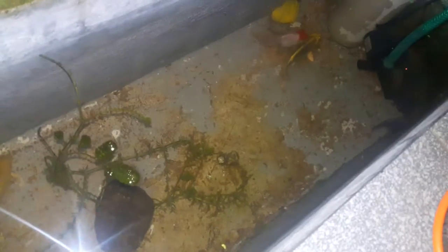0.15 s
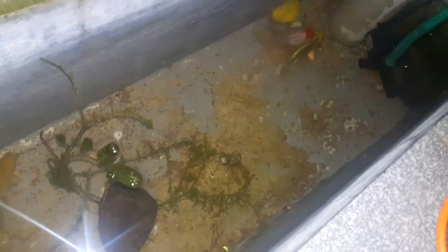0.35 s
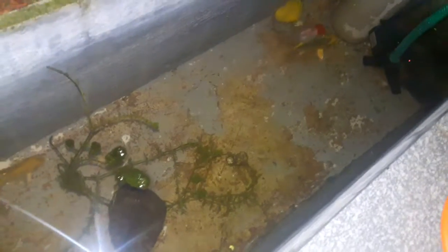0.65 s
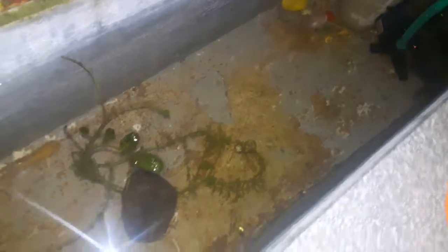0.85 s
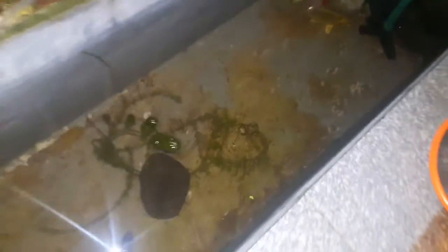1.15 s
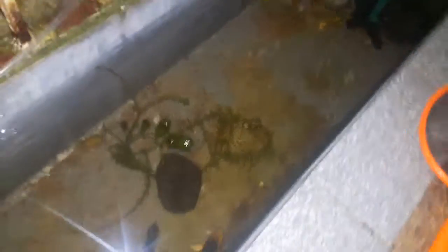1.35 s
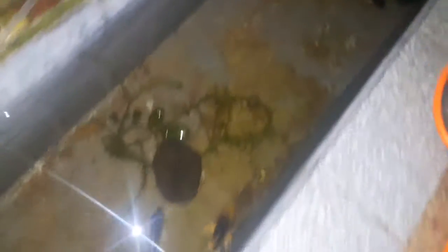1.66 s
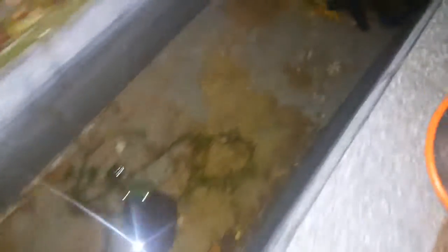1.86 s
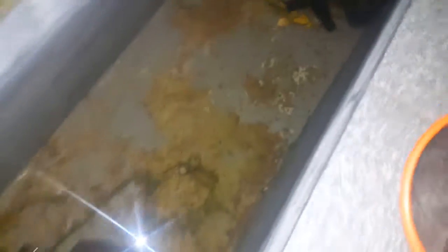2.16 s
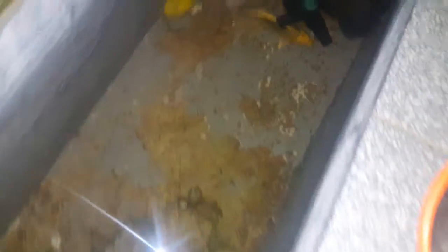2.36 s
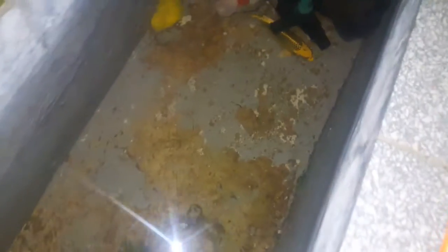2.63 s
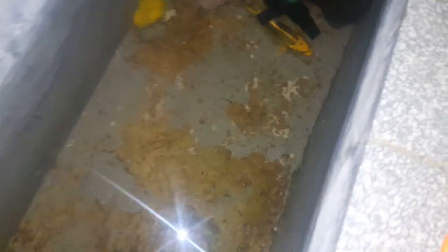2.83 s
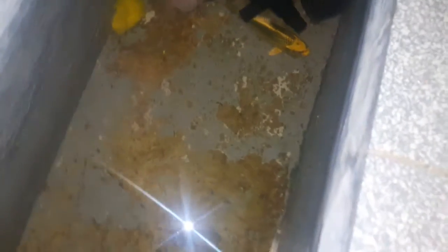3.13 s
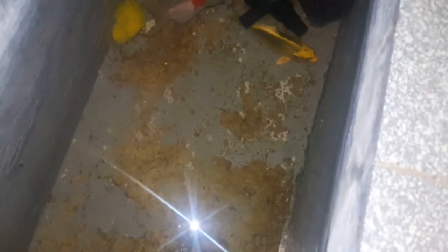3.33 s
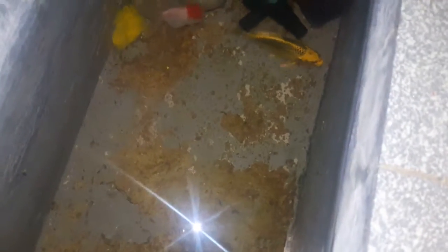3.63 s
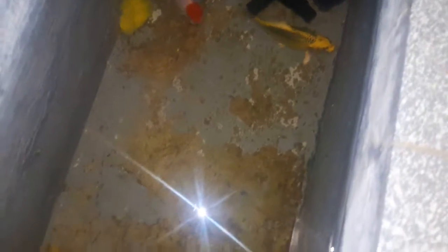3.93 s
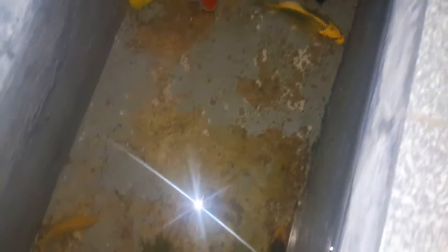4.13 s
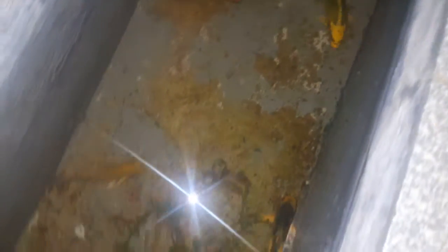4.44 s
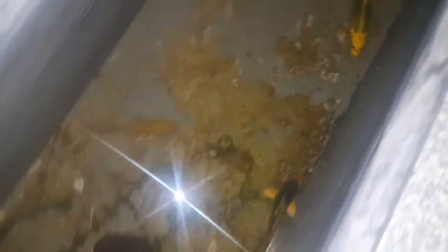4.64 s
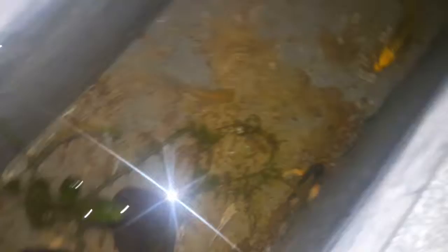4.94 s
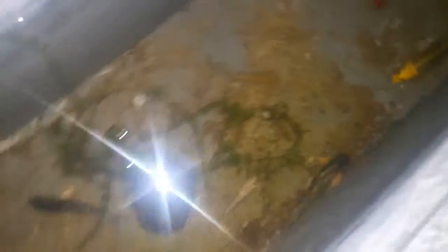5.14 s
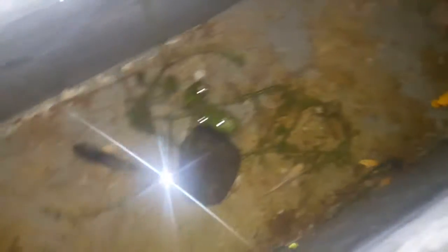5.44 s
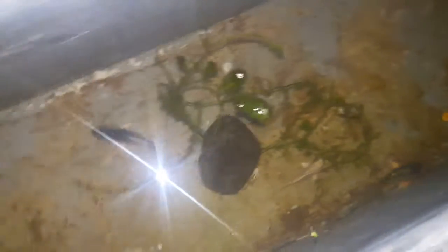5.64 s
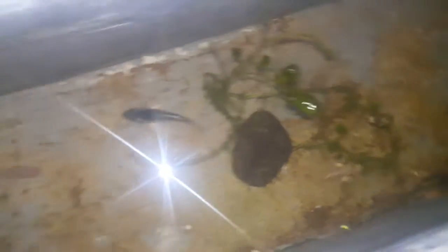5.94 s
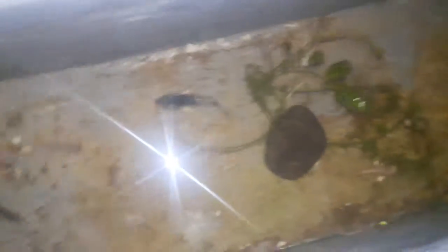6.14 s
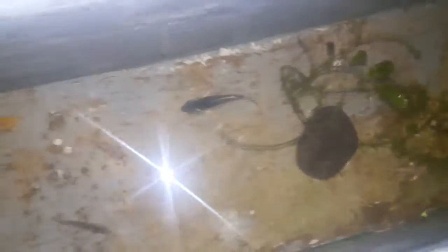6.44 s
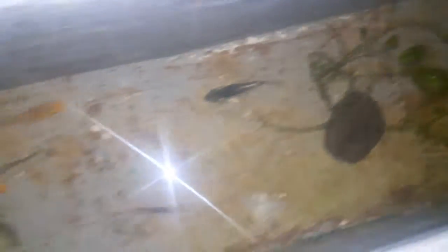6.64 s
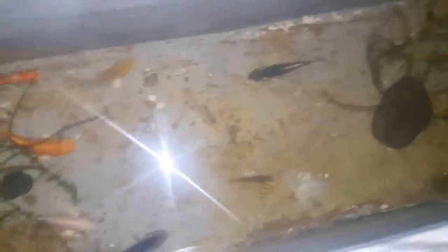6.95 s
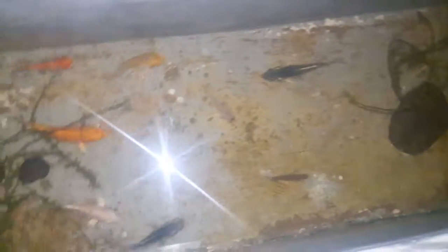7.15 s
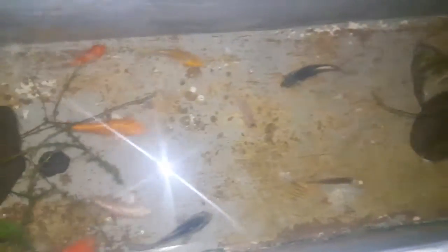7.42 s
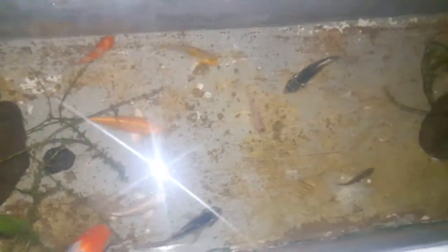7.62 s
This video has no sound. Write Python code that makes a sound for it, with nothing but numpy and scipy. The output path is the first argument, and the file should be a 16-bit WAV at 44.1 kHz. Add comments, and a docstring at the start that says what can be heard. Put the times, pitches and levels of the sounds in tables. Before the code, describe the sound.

A submerged pump hums low in a shallow fish tank while water churns, washes and pops with bubbles; close dull thuds and scrapes knock the microphone.

```python
"""A pump hums in a shallow fish tank while its moving water churns low, washes softly and pops with small bubbles.
Then knocks come close to the microphone: dull thuds, a short skid, rough scrapes and hard taps.
The hum is a set of sine waves, the water is shaped noise with tiny rings, and every knock rings one hollow body.
The hand-held microphone sounds muffled above 3 kHz and hisses faintly; the heaviest thud makes its gain control
turn the sound down for a second or two."""
import sys
import numpy as np
from scipy import signal
from scipy.fft import rfft, irfft, next_fast_len
from scipy.io import wavfile
from scipy.ndimage import uniform_filter1d, minimum_filter1d, map_coordinates

SR = 44100
rng = np.random.default_rng(int(sys.argv[2]) if len(sys.argv) > 2 else 0)


def file_out(sig):
    """Save sig as 16-bit WAV at sys.argv[1]."""
    # one column per channel
    cols = np.atleast_2d(sig).T
    # limit, then scale
    lim = np.clip(cols, -1, 1)
    pcm = np.round(lim * 32767).astype(np.int16)
    wavfile.write(sys.argv[1], SR, pcm)


N = 343098  # length in samples


def amp(db):
    """Turn decibels into a gain."""
    return 10 ** (np.asarray(db) / 20)


def unit(x):
    """Scale x to an rms of 1."""
    return x / np.sqrt(np.mean(x ** 2) + 1e-20)


def curves(rows):
    """Draw straight lines between table rows: one curve for each column after the time."""
    seconds, *columns = np.transpose(rows)
    t = np.arange(N) / SR
    return [np.interp(t, seconds, column) for column in columns]


def wobble(rate):
    """Draw a smooth random curve through `rate` random points a second."""
    points = rng.standard_normal(int(N * rate / SR) + 4)
    return map_coordinates(points, [np.arange(N) * rate / SR])


def filtered(x, response):
    """Multiply the spectrum of x by a response, which may be complex."""
    size = next_fast_len(len(x) + 8192)  # spare room so that the end does not wrap round
    hz = np.fft.rfftfreq(size, 1 / SR)
    return irfft(rfft(x, size) * response(hz), size)[:len(x)]


def coloured(x, spectrum):
    """Shape x by (Hz, dB) points on a log pitch scale, at rms 1."""
    points_hz, db = np.transpose(spectrum)
    return unit(filtered(x, lambda hz: amp(np.interp(np.log(hz + 1), np.log(points_hz), db))))


def edge(x, hz, kind, order):
    """Cut away the highs ("low" pass) or the lows ("high" pass), without looking ahead."""
    sections = signal.butter(order, min(hz, SR / 2 - 1), kind, fs=SR, output="sos")
    return signal.sosfilt(sections, x)


def add(track, start_s, sound):
    """Mix a sound into the track from its start time."""
    part = track[max(round(start_s * SR), 0):][:len(sound)]
    part += sound[:len(part)]


def room(x, t60):
    """Walls answer with a short noisy tail that falls 60 dB in t60 seconds."""
    t = np.arange(SR // 3) / SR
    build_up = 1 - np.exp(-t / 0.0078)
    tail = rng.standard_normal(len(t)) * amp(-60 * t / t60) * build_up
    return signal.fftconvolve(x, tail / np.linalg.norm(tail))[:N]


# How strongly the hum carries. Each row: time in seconds, gain in dB.
HUM_GAIN = [(0, -4), (2.6, -8.5), (3.5, -1.5), (5.7, -4.5), (6.2, 3), (7.78, 5)]
# The pump's tones. Each row: multiple of the mains rate, rms level in dB before waver and hum gain.
PUMP_TONES = [(1, -58), (2, -50.5), (3, -64), (4, -50), (6, -60), (7, -67), (12.3, -67)]
MAINS_HZ = 60


def pump():
    """The rotor runs locked to the mains; each tone wavers with the load of the water."""
    turns = MAINS_HZ * np.arange(N) / SR
    hum = np.zeros(N)
    for multiple, db in PUMP_TONES:
        waver_db = 1.6 * wobble(4)
        phase = 2 * np.pi * (multiple * turns + rng.random()) + 0.19 * wobble(5)
        hum += np.sqrt(2) * amp(db + waver_db) * np.sin(phase)
    return hum * amp(curves(HUM_GAIN)[0])


def bubble(hz, t60, rise):
    """A pocket of air rings and climbs in pitch, by the fraction `rise` in t60 seconds, as it nears the surface."""
    t = np.arange(SR // 16) / SR
    ring = np.sin(2 * np.pi * hz * (t + rise * t * t / (2 * t60)))
    return ring * amp(-60 * t / t60) * (1 - np.exp(-t / 0.00021))


def fizz(count, spread_db, pitch_hz, life):
    """Many small bubbles ring in clusters of four, a few louder than the rest."""
    out = np.zeros(N)
    for cluster in rng.random((count, 4, 4)):
        start_s = cluster[0, 0] * N / SR
        for delay, size, pitch, length in cluster:
            hz = pitch_hz * 2 ** (1.8 * (pitch - 0.5))
            ring = bubble(hz, life * (0.5 + length), rise=0.06)
            add(out, start_s + 0.03 * delay, amp(spread_db * size ** 2) * ring)
    return unit(out)


# Moving water as the microphone wanders over the tank.
# Each row: time in seconds, outflow level in dB, wash level in dB (both before the random swirl).
WATER_LEVELS = [(0, -56, -50.5), (1.3, -54, -47.5), (2.4, -56, -48), (3.1, -52, -40.5), (3.7, -52.5, -43.5),
                (4.45, -52, -37.5), (4.85, -53, -44.5), (5.6, -52.5, -44.5), (6.25, -50.5, -47.5),
                (6.8, -54, -47), (7.78, -54, -47)]
# Tone colours of the low churn, the wash and the trickle. Each row: pitch in Hz, relative strength in dB per Hz.
CHURN_COLOUR = [(20, -30), (33, -21), (47, -9.5), (62, 0.5), (100, -2.5), (130, 1.5), (170, 0), (205, -5),
                (300, -15), (500, -31), (900, -75)]
WASH_COLOUR = [(120, -25), (250, -3), (370, -0.5), (560, -1), (740, -1.5), (950, -8), (1400, -18),
               (2500, -35), (4000, -77)]
TRICKLE_COLOUR = [(400, -29), (900, -6.5), (1300, 0), (1750, -0.5), (2200, -7), (2850, -6.5), (3300, -14),
                  (3700, -22.5), (5000, -32), (7000, -54.5), (9000, -75)]
CHURN_OVER_FLOW_DB = 13  # mean churn level over the mean outflow level
CHURN_GROWTH = 0.69  # dB of churn for each dB of outflow


def water():
    """The outflow churns low and trickles at the surface; the water washes along the walls."""
    flow_db, wash_db = curves(WATER_LEVELS)
    mean_db = flow_db.mean()
    churn_db = mean_db + CHURN_OVER_FLOW_DB + CHURN_GROWTH * (flow_db - mean_db)
    swirl_db = 1.2 * wobble(14)
    churn = amp(churn_db + swirl_db) * coloured(rng.standard_normal(N), CHURN_COLOUR)

    # echoes between the walls favour some pitches of the wash
    flow = rng.standard_normal(N)
    echoing_flow = flow + amp(-8) * room(flow, t60=0.11)
    wash = amp(wash_db + 1.55 * wobble(16)) * coloured(echoing_flow, WASH_COLOUR)

    bubbles = fizz(count=900, spread_db=10.5, pitch_hz=1781, life=0.027)
    grains = rng.standard_normal(N) + amp(-7) * bubbles
    trickle = amp(flow_db + 0.94 * wobble(14)) * coloured(grains, TRICKLE_COLOUR)
    return churn + wash + trickle


STRAY_DB, STRAY_HZ = -36, 1747  # middle level and pitch of the lesser bubbles
STRAY_OCTAVES = 0.35  # furthest their pitch strays up or down


def stray_bubbles(count):
    """Lesser bubbles come at chance moments, as rows of seconds, level in dB and pitch in Hz."""
    rows = []
    for when, size, pitch in rng.random((count, 3)):
        hz = STRAY_HZ * 2 ** (STRAY_OCTAVES * (2 * pitch - 1))
        rows.append((when * N / SR, STRAY_DB + 4 * (size - 0.5), hz))
    return rows


# The clearest bubbles. Each row: start in seconds, level in dB before the soft onset, starting pitch in Hz.
CLEAR_BUBBLES = [(0.3538, -32.5, 2270), (1.7484, -30.5, 1850), (2.6925, -37, 2030), (2.984, -32.5, 1790),
                 (4.2757, -32, 1910), (4.8448, -32.5, 1710), (5.667, -32, 1640), (5.8486, -28, 1583),
                 (6.1424, -27.5, 1750), (6.256, -35, 2720), (6.408, -38, 2790), (6.7166, -31.5, 1510),
                 (7.4058, -28, 1300), (7.4446, -37, 1800)]


def pops(t60, splash_db, splash_t60):
    """Larger bubbles burst: each is a short ring in a little dull splash of noise."""
    out = np.zeros(N)
    t = np.arange(SR // 16) / SR
    onset = 1 - np.exp(-t / 0.0015)
    for start_s, db, hz in list(CLEAR_BUBBLES) + stray_bubbles(count=7):
        spray = edge(coloured(rng.standard_normal(len(t)), TRICKLE_COLOUR), 3300, "low", order=4)
        splash = spray * amp(splash_db - 60 * t / splash_t60)
        burst = bubble(hz, t60, rise=0.053) + splash
        add(out, start_s, amp(db) * burst * onset)
    return out


# Ringing modes of the knocked body. Each row: pitch in Hz, width in Hz before the damping factor, strength in dB.
BODY_MODES = [(113, 46, 2.5), (204, 180, 5), (390, 140, 4), (1102, 320, 7), (1800, 2500, -24.5)]


def contact(corner_hz, damping, low_hz, muffle_hz, rounding):
    """One rounded push rings the body, at peak 1; a softer push leaves more to the lowest mode alone."""
    def body(hz):
        return sum(amp(db) * 1j * hz * width / (centre * centre - hz * hz + 1j * hz * width * damping)
                   for centre, width, db in BODY_MODES)

    t = np.arange(SR // 8) / SR
    push = -t * np.exp(-2 * np.pi * corner_hz * t)
    push = edge(push, rounding * corner_hz, "low", order=2)
    ring = edge(filtered(push, body), low_hz, "high", order=3)
    ring = edge(ring, muffle_hz, "low", order=5)
    return ring / np.abs(ring).max()


# Spells of light handling.
# Each row: start in seconds, length in seconds, middle peak level in dB, contact corner in Hz.
HANDLING_SPELLS = [(0.858, 0.66, -22.5, 90), (2.23, 0.11, -25.5, 800), (6.048, 0.4, -30, 75)]
BUMP_SPREAD_DB = 2  # furthest a bump's level strays up or down


def bumps(count):
    """Small knocks spread unevenly over each spell, as rows of seconds, peak dB and corner Hz."""
    rows = []
    for start_s, length_s, db, corner_hz in HANDLING_SPELLS:
        for k, (when, size) in enumerate(rng.random((count, 2))):
            bump_s = start_s + length_s * (k + when) / count
            rows.append((bump_s, db + BUMP_SPREAD_DB * (2 * size - 1), corner_hz))
    return rows


# Single knocks; a soft contact has a low corner.
# Each row: start in seconds, peak in dB before the gain control, contact corner in Hz.
SINGLE_KNOCKS = [(0.653, -24.5, 450), (0.966, -6.5, 200), (0.967, -20, 4040), (0.985, -12, 127),
                 (1.172, -18.5, 60), (1.255, -23.5, 6000), (1.295, -15, 91.3), (1.316, -10.5, 1500),
                 (1.365, -1, 112), (1.3655, -17, 400), (2.413, -17, 1280), (2.5215, -20.5, 480),
                 (2.8726, -21.5, 400), (3.303, -20, 800), (3.309, -15.5, 26), (3.354, -19, 25),
                 (5.700, -23, 2460), (5.735, -24.5, 2490), (6.244, -18.5, 1500), (6.3965, -22.5, 1800),
                 (6.6747, -18, 2180), (6.823, -26.5, 2030), (6.8618, -4, 1390), (7.711, -24, 70),
                 (7.743, -27.5, 1000)]


def knocks():
    """Each brief contact lets the body ring freely."""
    out = np.zeros(N)
    for start_s, db, corner_hz in list(SINGLE_KNOCKS) + bumps(count=4):
        hit = contact(corner_hz, damping=0.97, low_hz=61.4, muffle_hz=2900, rounding=4.34)
        add(out, start_s, amp(db) * hit)
    return out


# The first catch: start in seconds, peak in dB before scatter, contact corner in Hz.
SKID_S, SKID_DB, SKID_CORNER_HZ = 0.6563, -8.5, 199
SLIP_GAP_S, SLIP_SHRINK = 0.018, 0.92  # first gap in seconds; each gap over the one before
# dB and octaves lost each time the number of slips doubles
SLIP_FADE_DB, SLIP_SOFTENS_OCTAVES = 3.9, 0.3


def skid(count):
    """Stick and slip: quicker, softer and mostly weaker slips stay on the body and damp it."""
    out, start_s = np.zeros(N), SKID_S
    for k in range(count):
        doublings = np.log2(k + 1)
        corner_hz = SKID_CORNER_HZ * 2 ** (-SLIP_SOFTENS_OCTAVES * doublings)
        slip = contact(corner_hz, damping=3.2, low_hz=84, muffle_hz=1500, rounding=2.5)
        scatter_db = 3.5 * rng.uniform(-1.1, 1)  # slips differ a little in strength
        add(out, start_s, amp(SKID_DB - SLIP_FADE_DB * doublings + scatter_db) * slip)
        start_s += SLIP_GAP_S * SLIP_SHRINK ** k
    return out


# Rough rubbing that goes with some contacts.
# Each row: start in seconds, length in seconds, rms level in dB before the gain control.
RUBBING_MOMENTS = [(0.967, 0.057, -41.5), (1.256, 0.036, -41), (1.317, 0.032, -41.5), (1.382, 0.08, -38),
                   (1.439, 0.5, -50.5), (3.298, 0.027, -36), (3.345, 0.019, -37.5)]
# Tone colour of the rubbing. Each row: pitch in Hz, relative strength in dB per Hz.
RUB_COLOUR = [(80, -18), (200, 13), (500, 12), (1300, -3.5), (2600, -8), (3400, -22.5), (4200, -30.5),
              (5200, -34), (7000, -56.5)]


def scrapes():
    """A surface slides for a moment: uneven noise swells quickly and trails off."""
    out = np.zeros(N)
    for start_s, length_s, db in RUBBING_MOMENTS:
        u = np.linspace(0, 1, max(int(length_s * SR), 64))  # from start to end of the rub
        roughness = amp(2.7 * wobble(190)[:len(u)])
        rub = coloured(rng.standard_normal(len(u)), RUB_COLOUR) * roughness
        swell = u * (1 - u) * np.exp(-5 * u)
        add(out, start_s, amp(db) * unit(rub * swell))
    return out


DUCK_ABOVE_DB, DUCK_KNEE_DB = -10, 2  # level where the cut begins; further rise that trips it fully
DUCK_DB, DUCK_HOLD_S, DUCK_GLIDE_S = 7.5, 1.06, 0.42  # fullest cut, hold time, glide time constant


def gain_control(x):
    """A very loud moment trips a cut in gain, which glides in, holds and glides out again."""
    power = np.abs(uniform_filter1d(x * x, size=SR // 100))  # averaged over 10 ms
    level_db = 10 * np.log10(power + 1e-12)
    tripped = np.clip((level_db - DUCK_ABOVE_DB) / DUCK_KNEE_DB, 0, 1)
    hold = int(DUCK_HOLD_S * SR)
    held = -minimum_filter1d(-tripped, hold, origin=(hold - 1) // 2)  # the highest trip of the hold time
    glide = edge(held, 1 / (2 * np.pi * DUCK_GLIDE_S), "low", order=1)
    return x * amp(-DUCK_DB * glide)


def scene():
    """Near sounds with a little room lie over the water and the pump."""
    bursts = pops(t60=0.029, splash_db=-11.5, splash_t60=0.075)
    near = bursts + knocks() + skid(count=8) + scrapes()
    echo = amp(-24.5) * room(near, t60=0.24)
    return (pump() + water() + near + echo)[None]


# Tone colour of the microphone's hiss. Each row: pitch in Hz, relative strength in dB per Hz.
HISS_COLOUR = [(3000, -3), (6000, -3.5), (8000, -12), (9000, -7.5), (10500, -5.5), (12000, -1),
               (15500, -0.5)]
HISS_DB = -79.5  # rms before the gain control and the band limit
TOP_HZ = 15720  # band limit


def record(dry):
    """The microphone adds a faint hiss, rides its gain and keeps nothing above its band limit."""
    hiss = amp(HISS_DB) * coloured(rng.standard_normal(N), HISS_COLOUR)
    levelled = gain_control(dry[0] + hiss)
    return filtered(levelled, lambda hz: hz < TOP_HZ)[None]


dry = scene()
out = record(dry)
file_out(out)
```